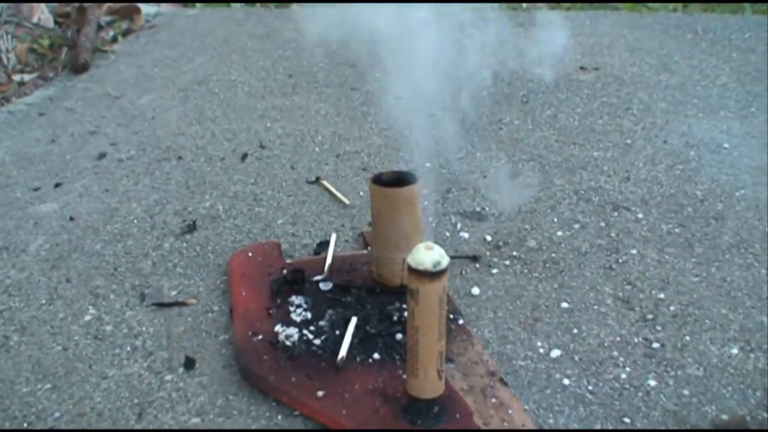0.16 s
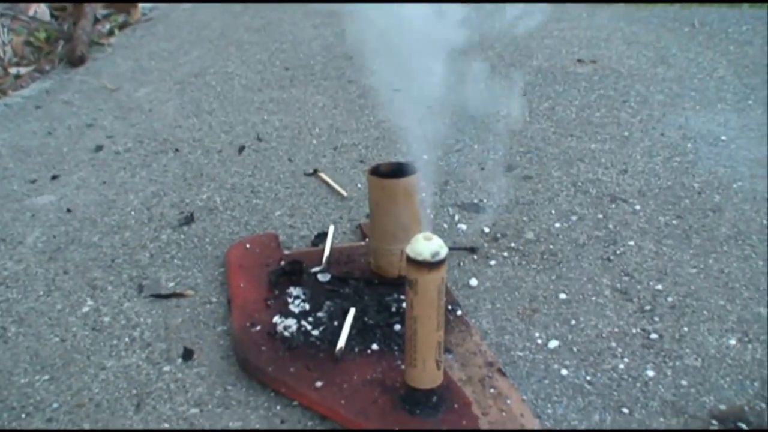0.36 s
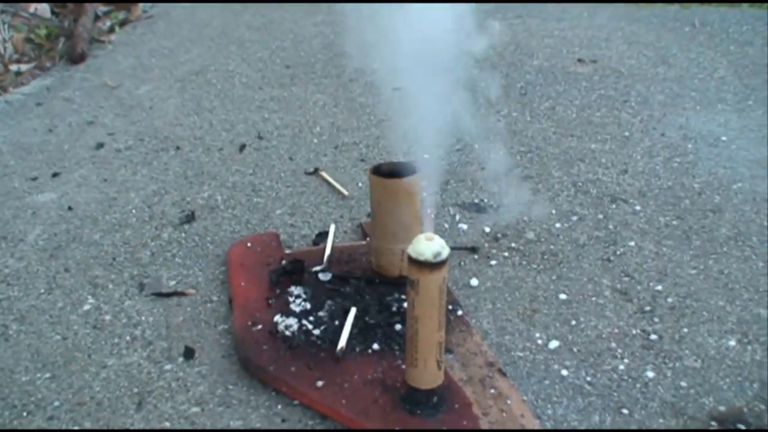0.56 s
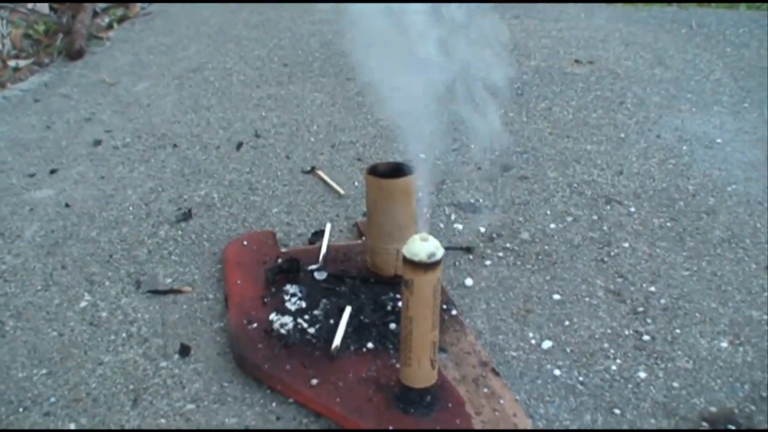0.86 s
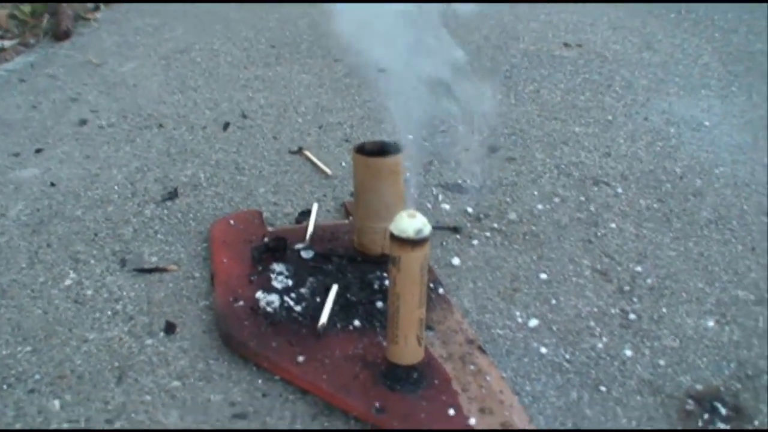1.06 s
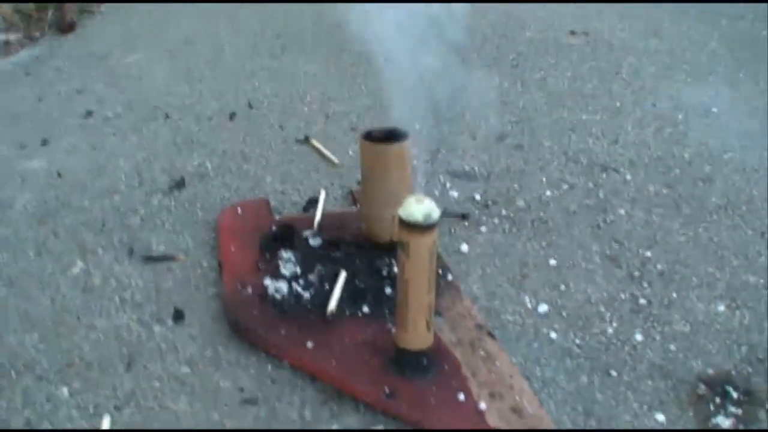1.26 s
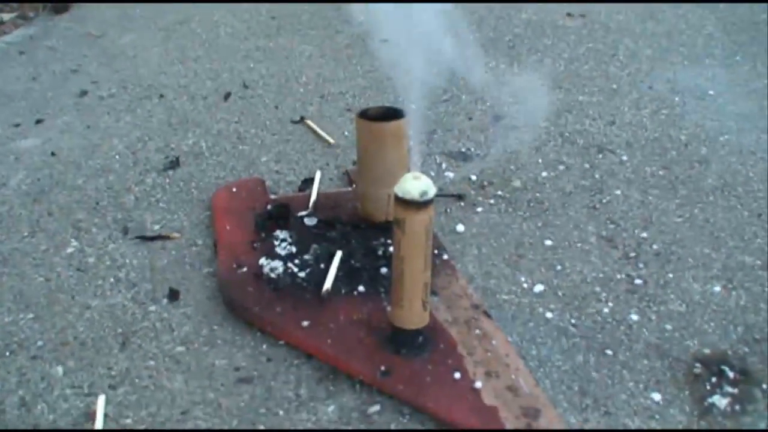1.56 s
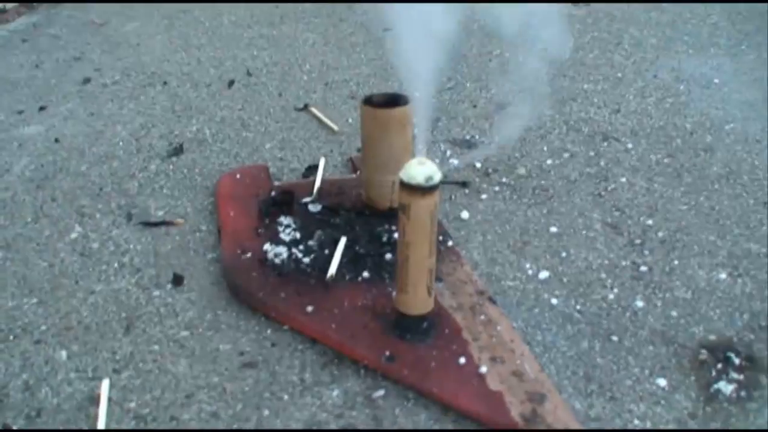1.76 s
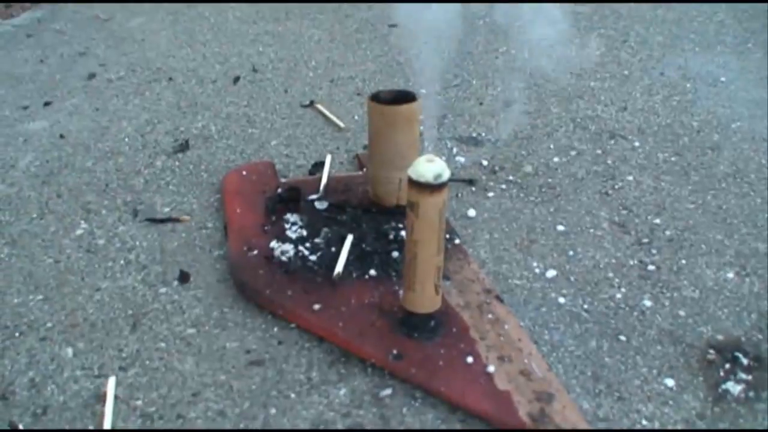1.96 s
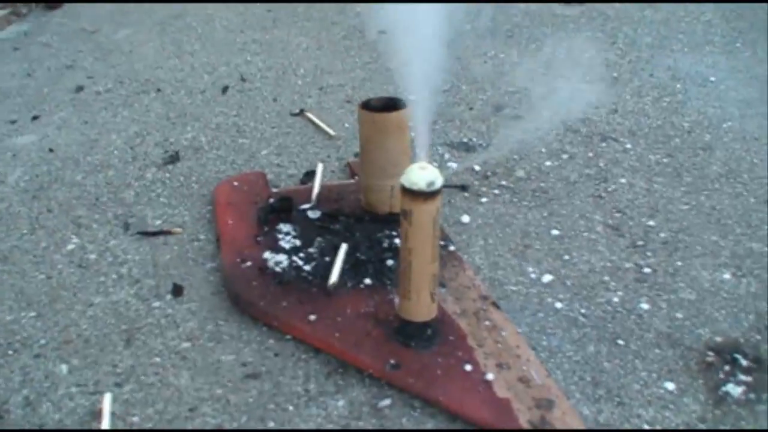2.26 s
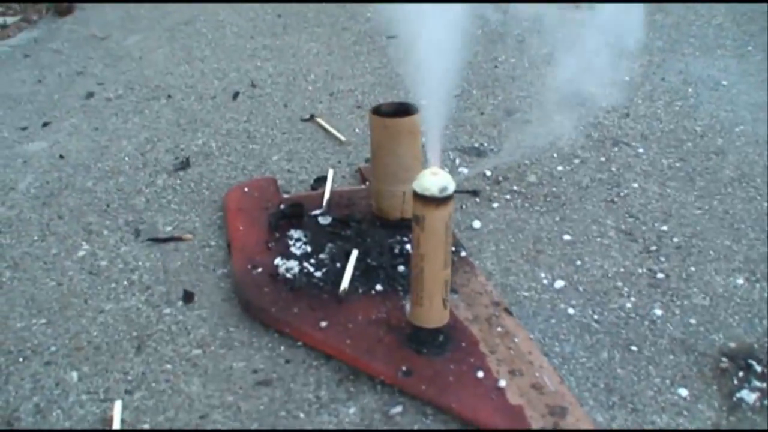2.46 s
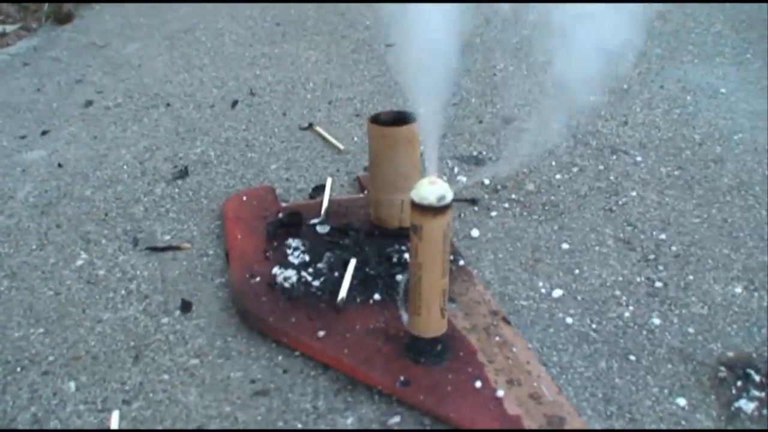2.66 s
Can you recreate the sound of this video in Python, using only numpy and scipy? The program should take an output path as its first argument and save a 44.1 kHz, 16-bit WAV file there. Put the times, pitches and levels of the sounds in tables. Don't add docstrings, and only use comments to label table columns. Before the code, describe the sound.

Harsh, bright jet hiss from a small burning rocket motor on pavement, fluttering, choking and swelling

```python
import sys
import numpy as np
from scipy import signal
from scipy.fft import rfft, irfft
from scipy.io import wavfile
from scipy.ndimage import uniform_filter1d

SR = 44100
rng = np.random.default_rng(int(sys.argv[2]) if len(sys.argv) > 2 else 0)


def store_pcm(level_fs):
    pcm = np.round(np.clip(level_fs, -1, 1) * 32767).astype(np.int16)
    wavfile.write(sys.argv[1], SR, np.atleast_2d(pcm).T)


def natural_amplitude(level_db):
    exponent = np.asarray(level_db, float) / 20
    return 10 ** exponent


N = 123479
TIME = np.arange(N) / SR
FREQ = np.maximum(np.fft.rfftfreq(N, 1 / SR), 1.)

# [f/Hz, level/dB per Hz]
RUMBLE_SPECTRUM = [(25, -20), (45, -1.5), (70, 3.5), (130, -2), (165, -9), (400, -24.5), (1500, -23),
                   (4000, -54)]
# [t/s, level/dB]
FINGER_TAPS = [
    (1.731, -30),
    (1.929, -33.5),
    (2.136, -34),
    (2.156, -26.5),
]
# [f/Hz, level/dB, decay/s]
HOUSING_MODES = [(575, -11, 0.0045), (830, -1.5, .008), (1230, 4.5, 0.004), (1550, -7, 0.0022)]
# [t/s, level/dB, extra treble/dB]
CHAMBER_PRESSURE = [(0, -26.5, 0), (.15, -19.5, -0.5), (.3, -23, 0.5), (.6, -18, -0.5), (.77, -21, 0),
                    (1.0, -22.5, 0), (1.3, -23.5, 0.5), (1.42, -19.5, -0.5), (1.57, -17.5, -0.5),
                    (1.66, -21, 0), (1.84, -18, 0.5), (2.05, -21.5, 1), (2.2, -18.5, 0), (2.38, -15, 2.5),
                    (2.6, -16.5, 1), (2.8, -18.5, 1)]
# [t/s, change/dB, length/s]
SLAG_CHOKES = [(.155, 1, 0.0084), (0.201, -4.5, 0.0061), (0.234, -8.5, 0.0096), (0.318, -7, 0.011),
               (0.358, 0.5, 0.0069), (0.452, -1.5, 0.029), (.48, 5, 0.0062), (0.499, -3.5, .012),
               (0.697, -2, 0.024), (0.825, -5, 0.026), (0.962, -3.5, 0.019), (1.094, -6.5, 0.016),
               (1.155, -2.5, 0.0082), (1.232, -8, 0.015), (1.311, -7, 0.013), (1.395, 0.5, .01),
               (1.543, -1, 0.014), (1.612, -3.5, 0.013), (1.68, -0.5, 0.0094), (1.87, -3, .012),
               (1.912, -6.5, 0.026), (1.993, -7.5, 0.013), (2.032, -10, 0.013), (2.089, -6.5, 0.021),
               (2.185, 3.5, 0.013), (2.33, -1.5, .02), (2.506, -0.5, 0.015), (2.66, -1, 0.012),
               (1.95, 1, 0.021)]
# [f/Hz, level/dB per Hz]
JET_SPECTRUM = [(70, -31), (270, -10), (900, -10.5), (1400, -12.5), (2500, 0.5), (5500, -6), (8000, -8),
                (15500, -9.5)]
# [f/Hz, slope/dB per dB]
PRESSURE_RESPONSE = [(200, 1.12), (1000, 0.86), (3000, 0.96), (6000, 0.73), (12000, 0.82)]
# [f/Hz, width/Hz, level/dB]
PORT_RESONANCES = [(2222, 1030, -4), (2911, 1130, 5.5), (3525, 1030, -6.5), (10050, 2600, -1),
                   (12100, 3000, -9)]
# [delay/ms, gain/1]
REFLECTIONS = [(.75, -0.081), (3.08, 0.11), (3.25, 0.088), (3.4, -0.036)]
# [f/Hz, level/dB, lead/rad, unshared power/0-1]
LEFT_PORT = [(250, -10.5, 1.26, 0.74), (700, -6, .3, .45), (1410, -5, 0.47, 0.46), (2920, -6, -0.26, 0.03),
             (4300, -3.5, 0.51, 0.17), (6400, -1.5, 0.92, 0.12), (10100, -4, -0.47, 0.56),
             (12500, -6, 0.6, 0.4)]
# [f/Hz, side gain/dB]
STEREO_WIDTH = [(4500, 0), (4800, -5), (7400, -4), (7700, -7), (8700, -7), (9000, 0), (13750, 0),
                (13950, -16)]


def along(table, col=1):
    table = np.array(table, float)
    return np.interp(np.log(FREQ), np.log(table[:, 0]), table[:, col])


def unit(x):
    return x / np.sqrt(np.mean(x ** 2))


def walk(rate_hz):
    steps = rng.standard_normal(4000)
    joined = np.interp(TIME * rate_hz, np.arange(len(steps)), steps)
    return unit(uniform_filter1d(joined, max(int(SR / rate_hz), 1)))


def bell(centre_s, length_s):
    return np.exp(-.5 * ((TIME - centre_s) / length_s) ** 2)


def rumble():
    right, own = rfft(rng.standard_normal((2, N))) * natural_amplitude(along(RUMBLE_SPECTRUM))
    lead_rad = 2.14
    left = natural_amplitude(-20) * np.exp(1j * lead_rad) * right + natural_amplitude(-25) * own
    both = irfft(np.array([left, right]), N)
    gust_db = 6.5 * bell(0.512, 0.032)
    return both / both[1].std() * natural_amplitude(-38.5 + gust_db)


def taps():
    out = np.zeros(N)
    mixes = rng.standard_normal((len(FINGER_TAPS), len(HOUSING_MODES)))
    for (start, tap_db), mix in zip(FINGER_TAPS, mixes):
        age = np.maximum(TIME - start, 0)
        for (hz, mode_db, decay), chance in zip(HOUSING_MODES, mix):
            level = natural_amplitude(tap_db + mode_db + 2 * chance)
            shifted_hz = hz * (1 + 0.055 * chance)
            out += level * np.exp(-age / decay) * np.sin(2 * np.pi * shifted_hz * age)
    return out * np.array([[1], [0]])


def pressure():
    db = np.interp(TIME, *np.array(CHAMBER_PRESSURE).T[:2])
    for centre, change_db, length in SLAG_CHOKES:
        db = db + change_db * bell(centre, length)
    flutter_db, flutter_hz = 0.64, 44.97
    return db + flutter_db * walk(flutter_hz)


def turbulence(db):
    spit_db, spit_hz = 0.5, 496
    own_db, own_hz = 0.87, 8.69
    eddies = rfft(rng.standard_normal((2, N)) * natural_amplitude(spit_db * walk(spit_hz)))
    treble_db = np.interp(TIME, *np.array(CHAMBER_PRESSURE).T[::2])
    response_hz, response = np.array(PRESSURE_RESPONSE).T
    out = 0
    for octave in np.arange(5.5, 15.):
        share = np.cos(np.pi / 2 * np.clip(np.log2(FREQ) - octave, -1, 1)) ** 2
        follow = np.interp(octave, np.log2(response_hz), response)
        band_db = follow * (db - db.mean()) + own_db * walk(own_hz)
        if 2 ** octave >= 4000:
            band_db = band_db + treble_db
        out = out + irfft(eddies * share, N) * natural_amplitude(band_db)
    return out


def jet_colour():
    ring = 1
    for hz, width, db in PORT_RESONANCES:
        ring = ring + natural_amplitude(db) / (1 + 1j * (FREQ - hz * hz / FREQ) / width) ** 2
    echo = 1
    for delay_ms, gain in REFLECTIONS:
        echo = echo + gain * np.exp(-2j * np.pi * FREQ * delay_ms / 1e3)
    top = natural_amplitude(-5.5 * np.clip((FREQ - 13100) / 2000, 0, 2))
    notch_hz, notch_width_hz, notch_depth = 1438, 93, 0.53
    notch = 1 - notch_depth / (1 + (2 * (FREQ - notch_hz) / notch_width_hz) ** 2)
    return natural_amplitude(along(JET_SPECTRUM)) * np.abs(ring) * echo * top * notch


def jet():
    db = pressure()
    colour = jet_colour()
    colour = colour / np.sqrt(np.mean(np.abs(colour) ** 2))
    shared, own = rfft(turbulence(db)) * colour * natural_amplitude(db.mean())
    apart = np.clip(along(LEFT_PORT, col=3), 0, 1)
    lead = np.exp(1j * along(LEFT_PORT, col=2))
    left = natural_amplitude(along(LEFT_PORT)) * (np.sqrt(1 - apart) * lead * shared + np.sqrt(apart) * own)
    return irfft(np.array([left, shared]), N) * natural_amplitude(2.5)


def scene():
    return rumble() + taps() + jet()


def top_cut(x):
    return signal.sosfilt(signal.butter(12, 15670, fs=SR, output="sos"), x)


def record(dry):
    mid = (dry[0] + dry[1]) / 2
    side = irfft(rfft(dry[0] - dry[1]) / 2 * natural_amplitude(along(STEREO_WIDTH)), N)
    return top_cut(np.array([mid + side, mid - side]))


dry = scene()
out = record(dry)
store_pcm(out)
```